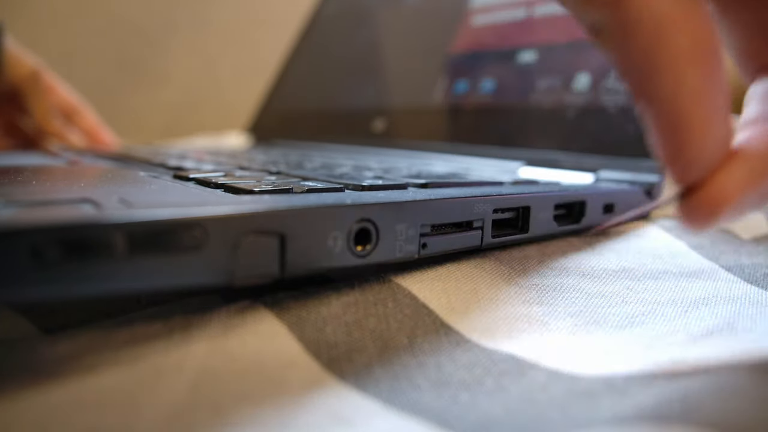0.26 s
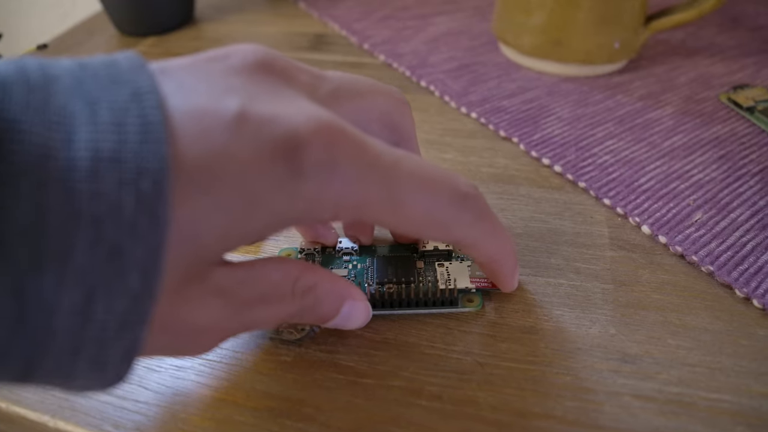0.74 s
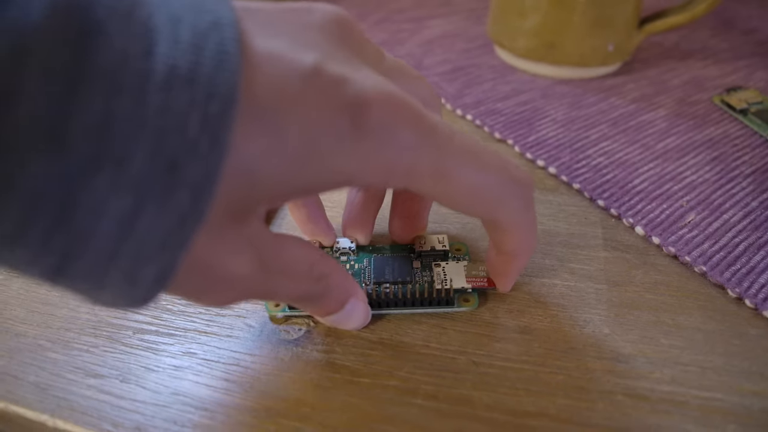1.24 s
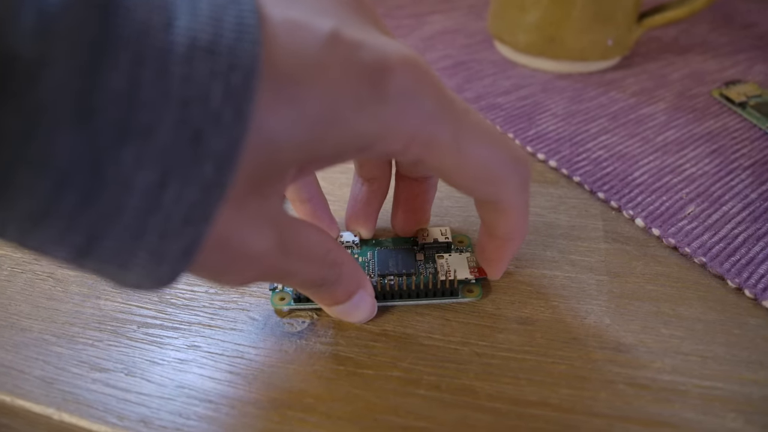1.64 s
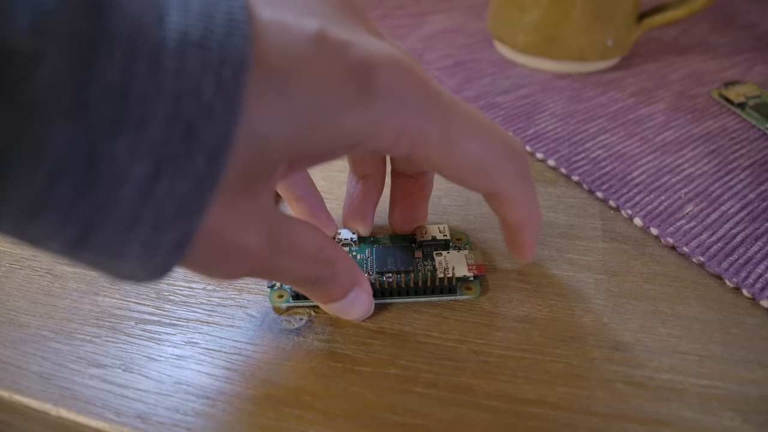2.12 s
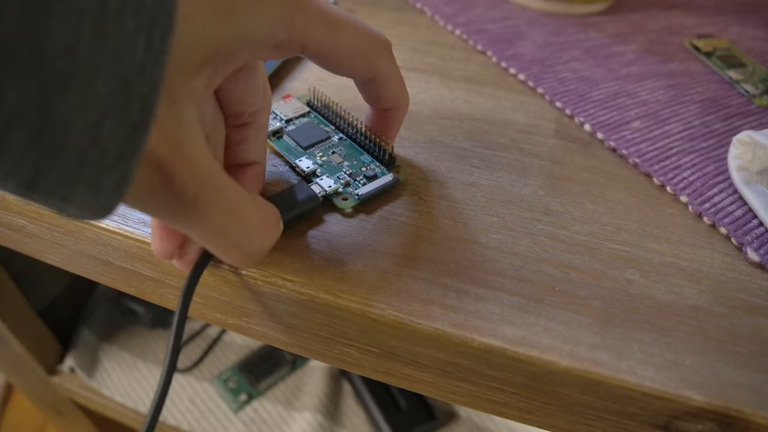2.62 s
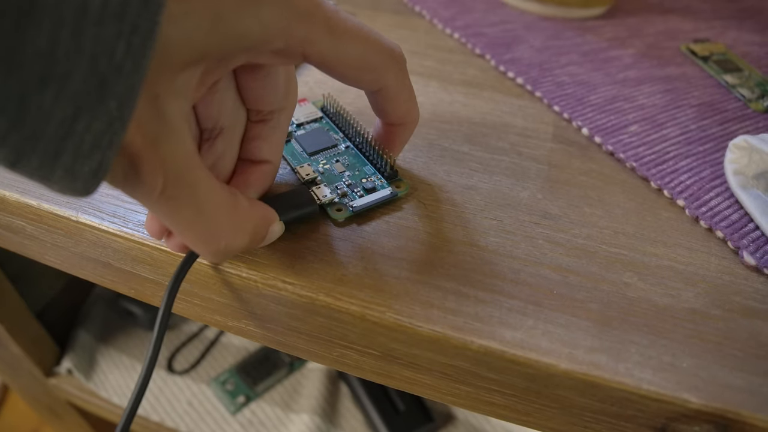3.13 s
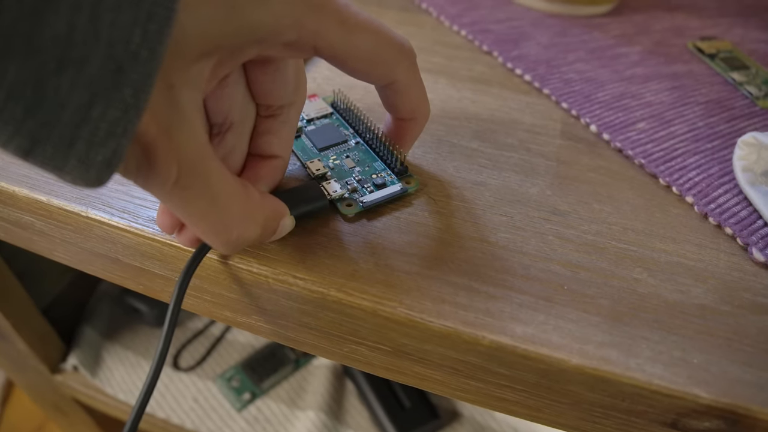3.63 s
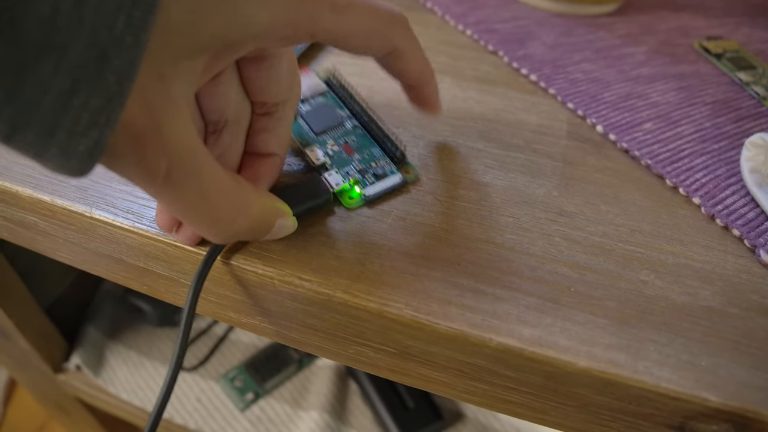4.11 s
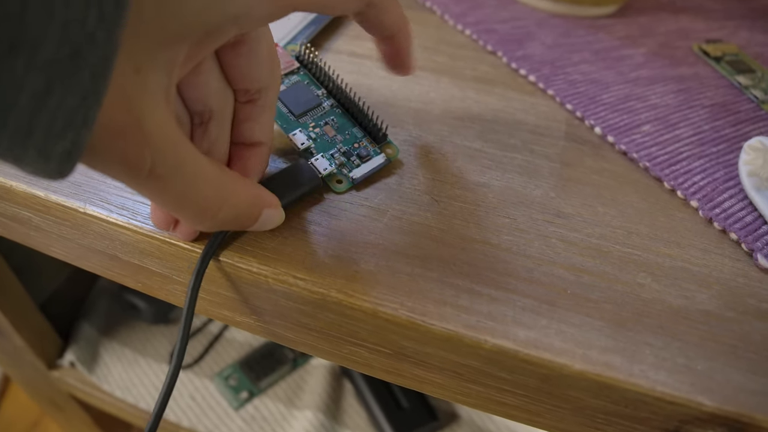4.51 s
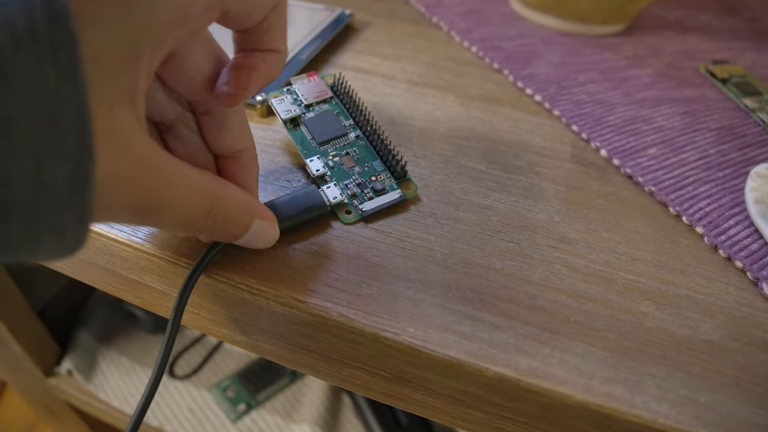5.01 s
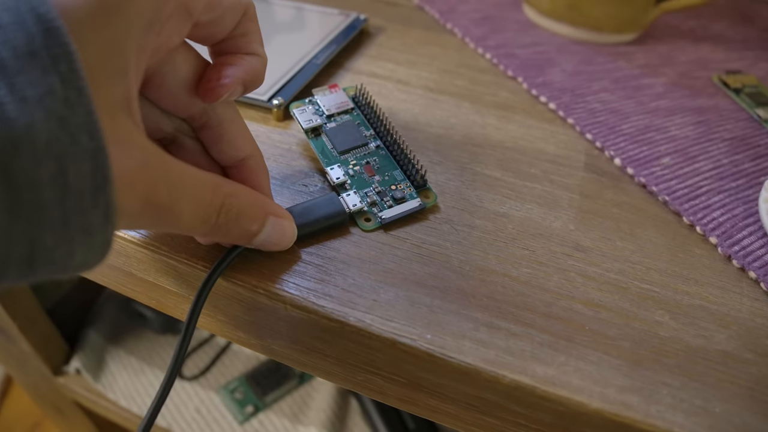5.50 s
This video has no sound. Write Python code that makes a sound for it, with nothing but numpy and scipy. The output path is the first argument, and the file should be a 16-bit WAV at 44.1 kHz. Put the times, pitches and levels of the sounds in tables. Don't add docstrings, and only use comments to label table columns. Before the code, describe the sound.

Close stereo recording in a quiet room. A small slot click opens over soft laptop fan air, which soon stops. A card snaps into a bare circuit board with a double click and dull desk thump, a fingernail taps, then a plug scrapes in and snaps home, loudest of all. The board then knocks and slides briefly on the wood, over fading hiss.

```python
import sys
import numpy as np
from scipy import signal
from scipy.fft import rfft, irfft
from scipy.io import wavfile
from scipy.ndimage import uniform_filter1d

SR = 44100
rng = np.random.default_rng(int(sys.argv[2]) if len(sys.argv) > 2 else 0)


def store_wav(level_fs):
    pcm = np.round(np.clip(np.atleast_2d(level_fs), -1, 1) * 32767)
    wavfile.write(sys.argv[1], SR, pcm.T.astype(np.int16))


def boost_factor(decibels):
    exponent = np.asarray(decibels, float) / 20
    return 10 ** exponent


N = 253575


def evened(x):
    return x / np.sqrt(np.mean(x ** 2) + 1e-20)


def read(points, hz):
    f, value = np.transpose(points)
    return np.interp(np.log(hz + 1), np.log(f + 1), value)


def add(mix, s, sound):
    part = mix[..., round(s * SR):][..., :sound.shape[-1]]
    part += sound[..., :part.shape[-1]]


def resonate(x, peaks):
    out = np.zeros_like(x)
    for k, (hz, width, db) in enumerate(peaks):
        b, a = signal.iirpeak(hz, hz / width, SR)
        out += (-1) ** k * boost_factor(db) * signal.lfilter(b, a, x)
    return out


def side_gain(same):
    same = np.clip(same, 0, 1)
    return np.sqrt((1 - same) / (1 + same))


def pair(count, same):
    mid, side = rng.standard_normal((2, count))
    side = side * side_gain(same)
    return np.array([mid + side, mid - side])


def stroke(peak_s, length):
    share, peak = np.arange(0, length, 1 / SR) / length, 0.5
    db = -18.5 * np.maximum(1 - share / peak, (share - peak) / (1 - peak))
    return peak_s - peak * length, db


# [f/Hz, level/dB per Hz]
HISS_COLOUR = [(200, 1), (1000, 1.5), (3000, 1.5), (6000, 1), (10000, 0.5), (15500, -0.5)]


def hiss():
    hz = np.fft.rfftfreq(N, 1 / SR)
    return evened(irfft(rfft(pair(N, 0.025)) * boost_factor(read(HISS_COLOUR, hz)) * (hz < 15900), N))


# [f/Hz, level/dB per Hz]
RUMBLE_COLOUR = [(25, -70), (40, -7), (50, 0), (90, 0), (227, -6.5), (330, -10), (1000, -17.5),
                 (4000, -30.5)]
# [f/Hz, likeness/share]
RUMBLE_LIKENESS = [(60, 0.54), (150, 0.33), (500, 0.16)]


def rumble():
    hz = np.fft.rfftfreq(N, 1 / SR)
    mid, side = rfft(rng.standard_normal((2, N))) * boost_factor(read(RUMBLE_COLOUR, hz))
    side = side * side_gain(read(RUMBLE_LIKENESS, hz))
    lumps_db = 0.77 * evened(uniform_filter1d(rng.standard_normal(N), 3000))
    return evened(irfft([mid + side, mid - side], N)) * boost_factor(lumps_db)


# [f/Hz, level/dB]
WHINE_TONES = [(10000, -18), (5540, -22.5)]


def whine():
    t = np.arange(N) / SR
    return sum(boost_factor(db) * np.sin(2 * np.pi * f * t) for f, db in WHINE_TONES)


# [t/s, level/dB]
RECORDER_GAIN = [(0.0, -50), (0.5, -52), (0.9, -50.5), (1.8, -51), (2.1, -53), (2.45, -57), (2.64, -60.5),
                 (3.0, -60), (3.4, -61), (5.75, -61)]


def background():
    s, gain_db = np.transpose(RECORDER_GAIN)
    gain = boost_factor(np.interp(np.arange(N) / SR, s, gain_db))
    return gain * (boost_factor(2.0) * (hiss() + whine()) + boost_factor(1.5) * rumble())


# [f/Hz, width/Hz, level/dB]
VENT = [(1020, 570, -0.5), (1700, 1000, -1.5), (2570, 980, -4)]


def fan():
    t = np.arange(N) / SR
    end_s, sag_db, fade_db = 0.455, -3, -250
    db = -56 + sag_db * t + fade_db * np.maximum(t - end_s, 0)
    return evened(resonate(pair(N, 0.73), VENT)) * boost_factor(db)


# [f/Hz, t60/s]
ROOM_T60 = [(150, 0.37), (500, 0.29), (1500, 0.39), (4000, 0.49), (7000, 0.41), (12000, 0.17)]
# [f/Hz, share]
ROOM_LIKENESS = [(300, 0.99), (2500, 0.49), (5000, 0.13), (10000, -0.41)]


def room(x):
    slots = np.arange(200, SR // 2, 20)
    at = slots + rng.integers(0, 20, (2, len(slots)))
    taps = np.zeros((2, SR // 2 + 20))
    np.put_along_axis(taps, at, rng.choice([-1., 1.], at.shape), 1)
    hz, t, z = signal.stft(taps, SR, nperseg=256)
    z = z + read(ROOM_LIKENESS, hz)[:, None] * z[::-1]
    decay = boost_factor(-60 * t / read(ROOM_T60, hz)[:, None])
    tail = signal.istft(z * decay, SR, nperseg=256)[1]
    return signal.fftconvolve(x[None], tail / np.linalg.norm(tail[0]), axes=1)[:, :N]


# [peak t/s, length/s, level/dB, f/Hz]
SQUEAK_STROKES = [
    (2.834, 0.038, -56.5, 5000),
    (3.219, .45, -60.5, 2295),
    (4.048, .08, -65, 4250),
    (4.981, 0.39, -69, 2320),
    (5.17, .35, -67, 2370),
]


def squeaks():
    out = np.zeros(N)
    for peak_s, length, level_db, hz in SQUEAK_STROKES:
        start, db = stroke(peak_s, length)
        peak = [(hz, 0.065 * hz, 0)]
        tone = evened(resonate(resonate(rng.standard_normal(SR), peak), peak))
        add(out, start, boost_factor(level_db + db) * tone[:len(db)])
    return out


# [peak t/s, length/s, rub level/dB, fizz level/dB]
SLIDE_STROKES = [(2.577, 0.32, -58.5, -80), (2.835, 0.059, -59, -59), (2.85, 0.17, -53, -78),
                 (2.937, 0.17, -51, -75), (3.252, .6, -59.5, -88), (4.039, 0.056, -57.5, -66),
                 (4.135, 0.074, -48.5, -57), (4.161, 0.062, -35, -46.5), (4.185, .12, -50, -51),
                 (4.21, .09, -45, -54), (4.292, .25, -60.5, -80), (4.651, .3, -56, -80),
                 (4.92, .4, -58, -85), (5.198, 0.47, -66, -87)]
# [f/Hz, width/Hz, level/dB]
RUB_BODY = [(247, 23, 13), (477, 106, 7), (850, 320, -2), (1450, 114, -0.5), (2200, 650, -7),
            (4100, 710, -15.5)]
# [f/Hz, width/Hz, level/dB]
FIZZ_BODY = [(5150, 900, 5.5), (7350, 2100, 3), (11700, 6000, 0.5), (14200, 2000, 7)]


def slides():
    out = np.zeros((2, N))
    for peak_s, length, rub_db, fizz_db in SLIDE_STROKES:
        start, db = stroke(peak_s, length)
        count = len(db)
        grit = evened(uniform_filter1d(rng.standard_normal(SR), size=90))[:count]
        rub = evened(resonate(boost_factor(1.3 * grit) * pair(SR, 0.98)[:, :count], RUB_BODY))
        fizz = evened(resonate(boost_factor(2.2 * grit) * pair(SR, 0.49)[:, :count], FIZZ_BODY))
        add(out, start, rub * boost_factor(rub_db + db) + fizz * boost_factor(fizz_db + db))
    return out


# [t/s, level/dB, t60/s]
SHUDDER_HITS = [
    (1.549, -28, 0.29),
    (2.144, -43.5, 0.15),
]
# [f/Hz, width/Hz, level/dB]
SHUDDER_BODY = [(261, 93, -2.5), (397, 120, 1), (570, 330, -4.5), (1020, 400, -9.5), (1500, 260, -4.5)]


def shudders():
    out, t = np.zeros((2, N)), np.arange(SR // 2) / SR
    lowpass = signal.butter(2, 1800, fs=SR, output="sos")
    for s, db, t60 in SHUDDER_HITS:
        dull = signal.sosfilt(lowpass, resonate(pair(len(t), 1.0), SHUDDER_BODY))
        rattle = boost_factor(-60 * t / (0.23 * t60))
        hum = boost_factor(-4.5 - 60 * t / t60)
        rise = np.minimum(t / 0.0043, 1)
        add(out, s, evened(dull) * boost_factor(db) * rise * (rattle + hum))
    return out


# [f/Hz, level/dB, t60/s]
DESK_MODES = [(216, -12, 0.17), (248, -5.5, 0.13), (308, -29.5, 0.03), (105.4, -17, 0.1)]
# [f/Hz, level/dB, share of t60]
FIXED_BOARD_MODES = [(992, -7.5, 0.92), (1910, -7.5, 0.52), (2454, -16.5, 0.72)]


def knocks(rows, ring_s, desk_share, room_db):
    near, far, t = np.zeros(N), np.zeros(N), np.arange(8000) / SR
    puffs = evened(resonate(rng.standard_normal((len(rows), len(t))), RUB_BODY))
    spots = rng.uniform(-1, 1, (len(rows), len(DESK_MODES)))
    for (s, db, hz, desk_db), spot, puff in zip(rows, spots, puffs):
        t60 = ring_s * (740 / hz) ** 0.82
        board = boost_factor(db - 13.0 - 60 * t / (2.0 * t60)) * puff
        for f, d, share in [(hz, 0, 1)] + FIXED_BOARD_MODES:
            board += boost_factor(db + d - 60 * t / (t60 * share)) * np.sin(2 * np.pi * f * t)
        desk = np.zeros(len(t))
        for (f, d, ring), u in zip(DESK_MODES, spot):
            level = boost_factor(desk_db + d + 3.0 * u - 60 * t / (ring * desk_share))
            desk += level * np.sin(2 * np.pi * f * (1 + u / 30) * t)
        contact_s = 0.0018 * boost_factor(-.35 * (db + 16.5))
        sound = board * np.minimum(t / contact_s, 1)
        sound += desk * np.minimum(t / 0.0026, 1)
        add(near, s, sound)
        add(far, s, boost_factor(room_db) * sound)
    return near, far


# [t/s, level/dB, board f/Hz, desk level/dB]
SHIFTS = [(4.034, -39.5, 1034, -44), (4.103, -42, 940, -49), (4.107, -40, 780, -56),
          (4.13, -29.5, 638, -57), (4.139, -23, 816, -55), (4.147, -28.5, 850, -39),
          (4.152, -24.5, 730, -41), (4.160, -20, 740, -35), (4.170, -39, 507, -36), (4.194, -41, 487, -33),
          (4.209, -35, 440, -50), (4.221, -37, 480, -55), (4.256, -41.5, 444, -68),
          (4.531, -43.5, 914, -68), (4.933, -65, 500, -43), (5.016, -67, 499, -47.5),
          (5.101, -51, 494, -50.5), (5.361, -48, 480, -53)]


def shift_knocks():
    return knocks(SHIFTS, ring_s=0.026, desk_share=1, room_db=-12.5)


# [t/s, level/dB, board f/Hz, desk level/dB]
TOUCHES = [(2.516, -37, 880, -64), (2.527, -60, 400, -44), (2.541, -35, 1980, -62), (2.542, -39, 960, -59),
           (2.555, -36.5, 775, -54.5), (2.564, -34, 723, -63), (2.837, -38.5, 957, -57),
           (2.846, -35.5, 1005, -47), (2.859, -63, 605, -45), (2.875, -37, 955, -47),
           (2.904, -35, 850, -46), (2.911, -39, 935, -52), (2.926, -30.5, 2000, -60),
           (2.928, -33.5, 970, -40), (2.962, -44, 990, -42)]


def aiming_touches():
    return knocks(TOUCHES, ring_s=0.03, desk_share=1, room_db=-12)


# [t/s, level/dB, board f/Hz, desk level/dB]
TAPS = [
    (2.069, -28.5, 610, -43),
    (2.145, -23, 1450, -40),
    (2.153, -19.5, 1400, -52),
]


def nail_taps():
    return knocks(TAPS, ring_s=0.01, desk_share=0.69, room_db=-9.5)


# [t/s, level/dB, board f/Hz, desk level/dB]
LATCH_BLOWS = [
    (1.149, -51, 504, -37.5),
    (1.5495, -27.5, 330, -28),
    (1.555, -23, 1000, -17.5),
    (1.5635, -22.5, 642, -24),
    (1.578, -33, 327, -39),
    (1.602, -35.5, 364, -51),
]


def latch_knocks():
    return knocks(LATCH_BLOWS, ring_s=0.035, desk_share=0.97, room_db=-14.5)


# [t/s, level/dB, board f/Hz, desk level/dB]
PUSHES = [
    (2.6646, -21.5, 980, -31),
    (2.667, -14.5, 680, -38),
    (2.6795, -22, 630, -38),
    (2.688, -21.5, 830, -34.5),
    (2.697, -26, 566, -37.5),
]


def push_knocks():
    return knocks(PUSHES, ring_s=0.023, desk_share=0.9, room_db=-19)


# [t/s, level/dB, board f/Hz, desk level/dB]
SEAT_BLOWS = [
    (2.977, -21.5, 965, -25.5),
    (3.015, -32, 830, -31),
    (3.11, -42, 395, -56),
    (3.31, -49, 454, -43.5),
]


def seat_knocks():
    return knocks(SEAT_BLOWS, ring_s=0.036, desk_share=0.81, room_db=-6)


def snaps(rows, peaks, same, crack_db, room_db):
    near, far, t = np.zeros((2, N)), np.zeros(N), np.arange(2048) / SR
    hz = np.fft.rfftfreq(len(t), 1 / SR)
    octaves = np.log2(np.clip(hz, 700, 16000) / 4000)
    small = hz ** 2 / (hz ** 2 + 900 ** 2)
    for s, db, fade_ms, bright_db in rows:
        burst = pair(len(t), same) * np.exp(-t * 1000 / fade_ms) * np.minimum(t / .0001, 1)
        burst[:, 4] += 2.5
        z = rfft(burst)
        smooth = np.sqrt(uniform_filter1d(abs(z) ** 2, size=15))
        burst = irfft(z / smooth, len(t))
        blow = (t == 0) * np.linalg.norm(burst[0])
        burst = np.vstack([burst, blow])
        ring = resonate(burst, peaks) + boost_factor(crack_db) * burst
        ring = irfft(rfft(ring) * boost_factor(bright_db * octaves) * small, len(t))
        ring *= np.linspace(1, 0, len(t)) ** 2
        ring *= boost_factor(db) / abs(ring[:2].mean(0)).max()
        add(near, s, ring[:2])
        add(far, s, boost_factor(room_db) * ring[2])
    return near, far


# [t/s, level/dB, fade/ms, brightness/dB per octave]
NAIL_CLICKS = [
    (2.1458, -20, 1.1, 0),
    (4.1035, -43, 1.4, 8),
    (4.1585, -24, 1.2, -3.5),
    (4.162, -29.5, 2.0, -4),
    (4.201, -38, 2.0, 6),
    (4.533, -49, 1.5, -2),
]
# [f/Hz, width/Hz, level/dB]
NAIL_RING = [(1600, 690, 0.5), (5760, 330, 8.5), (8300, 3900, -2.5), (12300, 3400, -1), (14400, 1500, -6)]


def nail_snaps():
    return snaps(NAIL_CLICKS, NAIL_RING, same=0.68, crack_db=-25, room_db=-27)


# [t/s, level/dB, fade/ms, brightness/dB per octave]
SLOT_CLICKS = [
    (0.0003, -18.5, 0.48, 0),
    (0.003, -27.5, 1.5, -10.5),
    (0.010, -42, 2, -19),
]
# [f/Hz, width/Hz, level/dB]
SLOT_RING = [(1840, 480, -3), (2650, 220, 1), (4250, 650, 5), (9100, 720, -5), (12100, 3300, -16)]


def slot_snaps():
    return snaps(SLOT_CLICKS, SLOT_RING, same=0.31, crack_db=-35, room_db=-25)


# [t/s, level/dB, fade/ms, brightness/dB per octave]
PLUG_CLICKS = [
    (2.6653, -13, 0.41, -3),
    (2.6668, -18.5, 3.0, -5.5),
    (2.6755, -19, 3.3, 3.5),
    (2.6777, -11.5, 0.4, 1.5),
    (2.6800, -27, 3.2, -1.5),
    (2.6848, -26, 1.3, -5),
]
# [f/Hz, width/Hz, level/dB]
PLUG_RING = [(1550, 1100, 5.5), (2380, 470, 11.5), (3420, 430, 7.5), (5500, 510, 7), (6900, 480, -5.5),
             (9700, 390, 3), (13700, 4000, -17)]


def plug_snaps():
    return snaps(PLUG_CLICKS, PLUG_RING, same=0.91, crack_db=-23, room_db=-29)


# [t/s, level/dB, fade/ms, brightness/dB per octave]
SEAT_CLICKS = [
    (2.9736, -1, 0.34, 1.1),
    (2.9745, -10, 1, 4.5),
    (2.9762, -20, 3, -5),
    (2.985, -20, 0.88, -22),
    (2.990, -37, 1.06, 9),
    (2.998, -28, 2.5, -2),
]
# [f/Hz, width/Hz, level/dB]
SEAT_RING = [(1950, 570, 3), (3160, 540, 1), (3860, 210, 2.5), (4920, 460, 7), (5460, 510, 4.5),
             (7050, 220, 2.5), (9650, 650, -11.5), (10680, 380, 0.5), (12400, 2600, -12)]


def seat_snaps():
    return snaps(SEAT_CLICKS, SEAT_RING, same=0.86, crack_db=-13.5, room_db=-9)


# [t/s, level/dB, fade/ms, brightness/dB per octave]
CARD_CLICKS = [
    (1.5478, -10.5, 1.5, 0),
    (1.5486, -4, 0.5, 0.5),
    (1.5505, -13, 2.4, 1.5),
    (1.5528, -13, 1.1, 1),
    (1.5550, -22.5, 5, -9.5),
    (1.5615, -8, .8, 1),
    (1.5622, -7, 0.52, 1.5),
]
# [f/Hz, width/Hz, level/dB]
CARD_RING = [(2720, 2400, -3), (3820, 970, -15), (5060, 690, -1), (6920, 420, 4.5), (9170, 780, -1),
             (12300, 1900, 3), (14940, 660, 9.5)]


def card_snaps():
    return snaps(CARD_CLICKS, CARD_RING, same=0.85, crack_db=-16.5, room_db=-38)


def scene():
    parts = [shift_knocks(), aiming_touches(), nail_taps(), latch_knocks(), push_knocks(), seat_knocks(),
             nail_snaps(), slot_snaps(), plug_snaps(), seat_snaps(), card_snaps()]
    direct = sum(near for near, far in parts)
    to_room = sum(far for near, far in parts)
    handling = direct + slides() + shudders() + squeaks()
    return background() + fan() + room(to_room) + handling


def top_cut(x):
    return signal.sosfilt(signal.butter(12, 15900, fs=SR, output="sos"), x)


def record(dry):
    ceiling, edge_hz = 0.95, 16600
    rounded = ceiling * np.tanh(dry / ceiling)
    lowpass = signal.firwin(255, edge_hz, window=("kaiser", 9), fs=SR)
    limited = signal.oaconvolve(rounded, lowpass[None], "same")
    return top_cut(limited)


dry = scene()
out = record(dry)
store_wav(out)
```